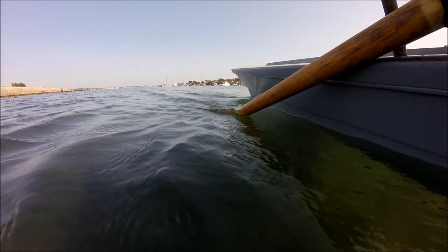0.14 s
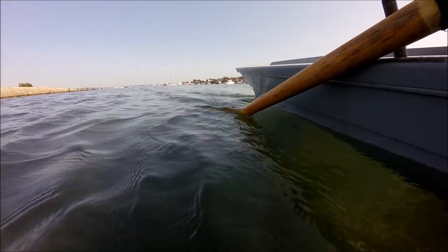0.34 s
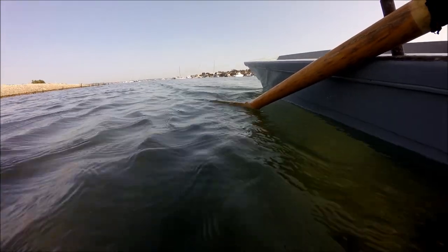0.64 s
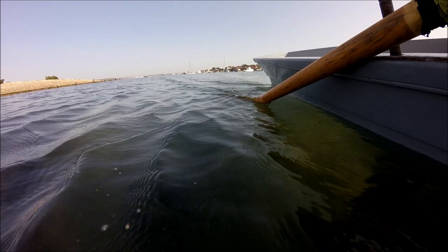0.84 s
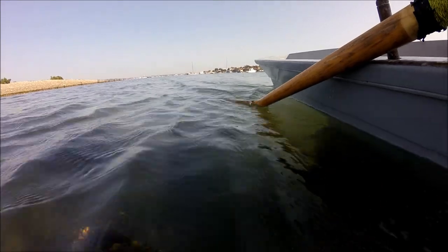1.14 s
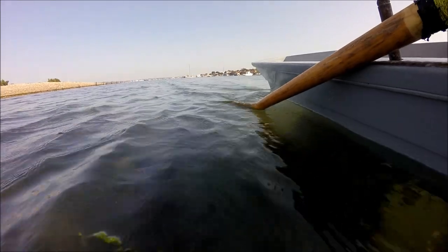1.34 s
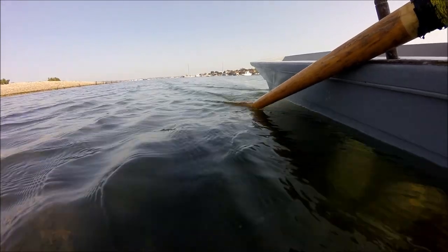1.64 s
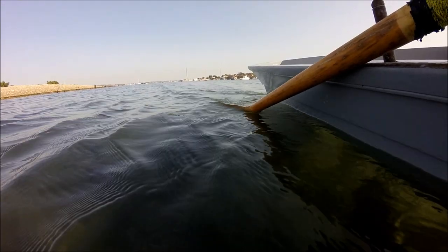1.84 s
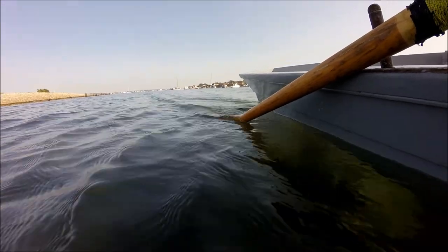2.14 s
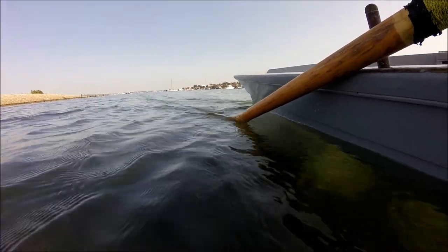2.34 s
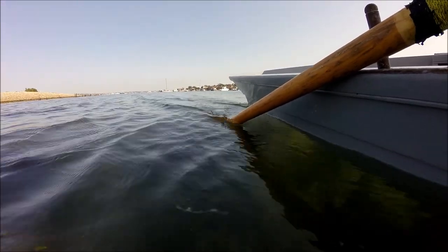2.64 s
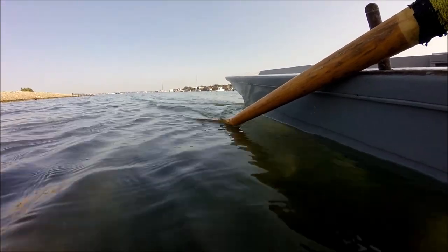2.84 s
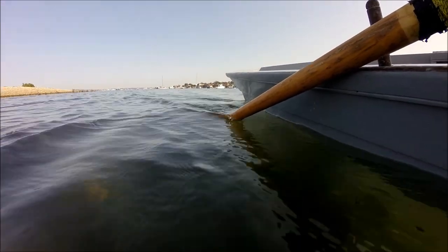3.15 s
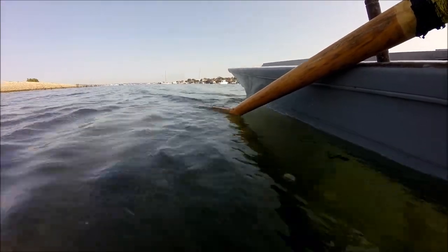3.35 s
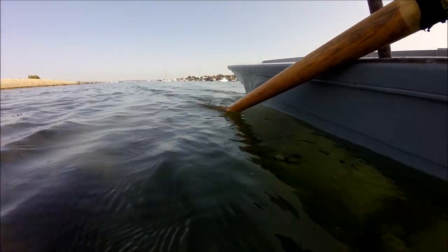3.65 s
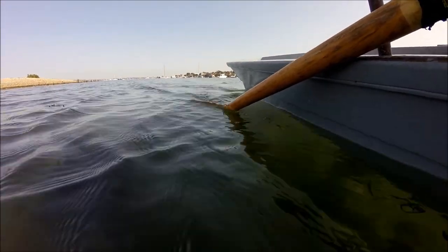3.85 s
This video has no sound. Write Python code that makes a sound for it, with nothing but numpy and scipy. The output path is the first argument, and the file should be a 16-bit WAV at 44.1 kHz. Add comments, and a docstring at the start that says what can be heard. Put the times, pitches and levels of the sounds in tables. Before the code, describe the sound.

Small waves lap and gurgle against a rowing boat's hull and oar, over light wind hiss

```python
"""Small waves lap at a rowing boat and its resting oar, on open water, microphone close by.
From the start, wind rumbles on the microphone over a steady hiss, and faint ripples plip and tick.
Laps come at once and keep coming: quick runs of bubbles, mostly from small to large, many with spray.
Trapped air gulps and single bubbles plip between them; from 0.3 s dull thuds come from the hull.
Every water sound gets a short ring from the hull's overhang."""
import sys
import numpy as np
from scipy import signal
from scipy.fft import rfft, irfft, next_fast_len
from scipy.io import wavfile

SR = 44100
rng = np.random.default_rng(int(sys.argv[2]) if len(sys.argv) > 2 else 0)


def file_out(sig):
    """Save sig as 16-bit WAV at sys.argv[1]."""
    # one column per channel
    cols = np.atleast_2d(sig).T
    # limit, then scale
    lim = np.clip(cols, -1, 1)
    pcm = np.round(lim * 32767).astype(np.int16)
    wavfile.write(sys.argv[1], SR, pcm)


N = 176400  # 4 s


def undb(db):
    """Decibels to gain."""
    return 10 ** (np.asarray(db) / 20)


def level(x, db):
    """Scale to an rms level in dB."""
    return x * undb(db) / np.sqrt(np.mean(x ** 2))


def colour(x, points):
    """Filter by a curve of (Hz, dB) points, joined by straight lines over log frequency."""
    hz, db = np.array(points).T
    size = next_fast_len(2 * len(x))
    f = np.maximum(np.fft.rfftfreq(size, 1 / SR), 1)
    gain = undb(np.interp(np.log(f), np.log(hz), db))
    return irfft(rfft(x, size) * gain, size)[:len(x)]


def add(out, start_s, x):
    """Mix a sound in at a time, cutting what runs past the end."""
    start = max(int(start_s * SR), 0)
    part = x[:max(len(out) - start, 0)]
    out[start:start + len(part)] += part


# Levels in the tables below are those at the source, before the trims, overhang and microphone.

# Strength of the wind rumble over time. Each row: time in seconds, level in dB.
RUMBLE_LEVEL = [(0, -39.5), (.28, -53), (.52, -32.5), (.74, -36.5), (1.0, -54), (1.15, -39.5), (1.8, -59),
                (1.99, -43), (2.18, -45), (2.27, -56.5), (2.49, -66), (2.58, -44), (2.74, -55.5),
                (2.80, -38.5), (3.0, -39.5), (3.12, -58), (3.24, -42.5), (3.58, -62), (4.0, -54.5)]
# Spectrum of the rumble. Each row: frequency in Hz, relative level in dB.
RUMBLE_SPECTRUM = [(20, -25), (45, -1), (75, -1), (130, -3), (320, -16.5), (700, -53.5)]
# Spectrum of steady air and distant water. Each row: frequency in Hz, relative level in dB.
HISS_SPECTRUM = [(30, -0.5), (400, -4.5), (1000, -9), (2000, -17.5), (3500, -18), (6000, -24), (10000, -18),
                 (15500, -18.5)]
RUMBLE_TRIM_DB, HISS_DB = -1.98, -53


def wind():
    """Low gusts on the microphone and a smooth, steady hiss, both of coloured noise."""
    gust_db = np.interp(np.arange(N) / SR, *np.array(RUMBLE_LEVEL).T)
    rumble = level(colour(rng.standard_normal(N), RUMBLE_SPECTRUM), RUMBLE_TRIM_DB) * undb(gust_db)
    hiss = level(colour(rng.standard_normal(N), HISS_SPECTRUM), HISS_DB)
    return rumble + hiss


GLIDE = 0.017  # share of its pitch a bubble gains per decay time


def bubble(hz, decay_s, rise_cycles, glide):
    """A pocket of air swells into ringing, then fades; its pitch creeps up by the glide."""
    rise_s = rise_cycles / hz
    t = np.arange(int((rise_s + 6 * decay_s) * SR)) / SR
    rise = np.sin(np.pi / 2 * np.minimum(t / rise_s, 1)) ** 2
    decay = np.exp(-np.maximum(t - rise_s, 0) / decay_s)
    phase = 2 * np.pi * hz * (t + glide * t ** 2 / (2 * decay_s))
    return rise * decay * np.sin(phase)


PLIP_RISE_S, PLIP_DECAY_S = 0.0015, 0.0075  # at 1 kHz
PLIP_SIZE_EXPONENT = 0.69  # how fast both shorten as the pitch goes up


def plip(hz):
    """One small bubble at the surface; the smaller, the sooner it swells and dies."""
    shorter = (hz / 1000) ** PLIP_SIZE_EXPONENT
    return bubble(hz, PLIP_DECAY_S / shorter, hz * PLIP_RISE_S / shorter, GLIDE)


RIPPLES_PER_S, RIPPLE_DB, RIPPLE_HZ, RIPPLE_SPREAD_OCT = 60, -57.5, 1100, 0.776
TICKS_PER_S, TICK_DB, TICK_HZ, TICK_SPREAD_OCT = 22, -55.5, 4580, 0.338
SCATTER_STRENGTH_DB = 4  # standard deviation of strength, for ripples and ticks


def scatter(per_s, db, centre_hz, spread_oct):
    """Single bubbles at random times, of random pitch and strength."""
    out = np.zeros(N)
    chance = rng.standard_normal(size=(900, 2))
    times = rng.random(size=len(chance)) * N / SR
    for s, (pitch, strength) in zip(times[:int(per_s * N / SR)], chance):
        hz = np.clip(centre_hz * 2 ** (spread_oct * pitch), 200, 9000)
        add(out, s, undb(db + SCATTER_STRENGTH_DB * strength) * plip(hz))
    return out


def ripples():
    """Faint bubbles and ticking tiny droplets all over the water nearby."""
    faint_bubbles = scatter(RIPPLES_PER_S, RIPPLE_DB, RIPPLE_HZ, RIPPLE_SPREAD_OCT)
    ticks = scatter(TICKS_PER_S, TICK_DB, TICK_HZ, TICK_SPREAD_OCT)
    return faint_bubbles + ticks


CLOUD_STRENGTH_DB = 3  # standard deviation of bubble strength, in laps and spray
CLOUD_SWELL_S, CLOUD_RISE_CYCLES = 0.0055, 0.41  # swell of the whole run, rise of each bubble


def cloud(length_s, first_hz, last_hz, per_s, spread_oct, cycles, fade_db):
    """A swelling run of bubbles, pitch sliding from first to last; rms 1 over its length."""
    chance = rng.standard_normal(size=(160, 2))
    jitter = rng.random(size=len(chance))
    count = int(np.clip(per_s * length_s, 2, len(chance)))
    out = np.zeros(int((length_s + .1) * SR))  # room for the last bubbles to ring
    for k, (pitch, strength) in enumerate(chance[:count]):
        along = (k + jitter[k]) / count  # 0 to 1 through the run
        centre_hz = first_hz * (last_hz / first_hz) ** along
        hz = np.clip(centre_hz * 2 ** (spread_oct * pitch), 150, 9000)
        gain = undb(CLOUD_STRENGTH_DB * strength + fade_db * along)
        swell = min(along * length_s / CLOUD_SWELL_S, 1)
        add(out, along * length_s, swell * gain * bubble(hz, cycles / hz, CLOUD_RISE_CYCLES, GLIDE))
    return out / np.sqrt(np.sum(out ** 2) / (length_s * SR))


# Bursts of spray as a lap breaks. Each row: start in seconds, level in dB, length in seconds.
SPRAY_BURSTS = [(0.009, -50.5, 0.04), (.533, -47.5, 0.025), (0.615, -50, 0.016), (.649, -50.5, 0.041),
                (.694, -45.5, .021), (1.072, -55.5, 0.029), (1.111, -49, .03), (1.49, -49.5, 0.031),
                (1.598, -58, 0.016), (1.98, -52.5, 0.022), (2.839, -47.5, 0.025), (3.274, -50, .043),
                (3.349, -55, 0.019), (3.765, -56.5, 0.043), (3.803, -51, 0.038)]
SPRAY_HZ, SPRAY_PER_S, SPRAY_SPREAD_OCT = 2427, 560, 0.446
FIZZ_HZ, FIZZ_PER_S, FIZZ_SPREAD_OCT = 5340, 530, 0.19
SPRAY_CYCLES = 3.9  # decay time of droplets and fizz, in cycles
SPRAY_FADE_DB = -1.5  # droplets, over the burst
SPRAY_TRIM_DB, FIZZ_DB = -4, -8.5  # fizz is against the droplets


def sprays():
    """The crest breaks into crackling droplets and a fizz of the tiniest bubbles."""
    out = np.zeros(N)
    for s, db, length_s in SPRAY_BURSTS:
        droplets = cloud(length_s, SPRAY_HZ, SPRAY_HZ, SPRAY_PER_S, SPRAY_SPREAD_OCT,
                         SPRAY_CYCLES, SPRAY_FADE_DB)
        fizz = cloud(length_s, FIZZ_HZ, FIZZ_HZ, FIZZ_PER_S, FIZZ_SPREAD_OCT, SPRAY_CYCLES, fade_db=0)
        add(out, s, undb(db + SPRAY_TRIM_DB) * (droplets + undb(FIZZ_DB) * fizz))
    return out


# Laps at the hull. Each row: start in seconds, rms level in dB, length in seconds,
# first bubble pitch in Hz, last bubble pitch in Hz (both before scatter).
LAP_RUNS = [(0.02, -42, 0.057, 1156, 561), (0.535, -35, 0.029, 1685, 465), (0.617, -46.5, 0.029, 1260, 420),
            (0.649, -40.5, .043, 1450, 466), (0.694, -39.5, .034, 1633, 318), (1.045, -47.5, 0.1, 653, 434),
            (1.123, -36.5, 0.031, 1410, 339), (1.262, -47.5, 0.014, 1070, 557), (1.5, -41, 0.038, 956, 494),
            (1.556, -50, 0.078, 386, 573), (1.957, -48.5, 0.031, 590, 426), (1.991, -44.5, .05, 1160, 293),
            (2.169, -48, 0.043, 943, 390), (2.280, -51.5, 0.013, 1550, 1200),
            (2.428, -47.5, 0.02, 733, 520), (2.599, -46, 0.037, 623, 496), (2.792, -40.5, 0.018, 1200, 606),
            (2.853, -39, 0.018, 1320, 700), (2.874, -46, 0.044, 633, 404), (3.274, -37.5, 0.026, 1510, 660),
            (3.303, -40.5, 0.033, 693, 440), (3.358, -39.5, 0.031, 660, 387), (3.759, -44, 0.049, 510, 385),
            (3.813, -44.5, 0.029, 1010, 690), (3.836, -49.5, 0.068, 370, 229)]
# Tone of the laps. Each row: frequency in Hz, gain in dB.
LAP_TONE = [(400, 2.5), (750, -0.5), (1050, 1.5), (1600, -4), (2600, 4), (8000, -1)]
LAP_BUBBLES_PER_S, LAP_SPREAD_OCT = 1000, 0.6045
LAP_CYCLES = 3.46  # decay time of each bubble, in cycles
LAP_TRIM_DB = -0.5


def laps():
    """A wave closes on the hull, catching bubbles that mostly grow larger along the run."""
    out = np.zeros(N)
    for s, db, length_s, first_hz, last_hz in LAP_RUNS:
        run = cloud(length_s, first_hz, last_hz, LAP_BUBBLES_PER_S, LAP_SPREAD_OCT, LAP_CYCLES, fade_db=-8)
        add(out, s, undb(db + LAP_TRIM_DB) * run)
    return colour(out, LAP_TONE)


# Gulps of trapped air. Each row: start in seconds, peak in dB, pitch in Hz, decay in seconds.
AIR_GULPS = [(.040, -33.5, 613, 0.0088), (0.044, -34, 288, 0.024), (0.55, -28, 425, 0.012),
             (0.566, -27, 327, 0.0052), (.627, -29.5, 317, 0.0091), (.664, -33, 438, 0.0082),
             (1.127, -26.5, 300.3, 0.016), (1.135, -27.5, 628, 0.012), (1.508, -37, 820, 0.018),
             (1.491, -36, 469, 0.023), (1.532, -28.5, 294, 0.0086), (1.972, -36, 321, 0.022),
             (2.175, -33, 455, 0.0077), (2.276, -36, 339, 0.013), (2.677, -38, 543, 0.0085),
             (3.287, -22, 367, 0.0074), (3.309, -31, 416, 0.01), (3.332, -24, 354, 0.006),
             (3.774, -37, 411, 0.036), (3.793, -28, 316, 0.012), (3.853, -37, 218, 0.013)]
GULP_TRIM_DB = -0.5


def gulps():
    """Large air pockets ring under the hull."""
    out = np.zeros(N)
    for s, db, hz, decay_s in AIR_GULPS:
        add(out, s, undb(db + GULP_TRIM_DB) * bubble(hz, decay_s, rise_cycles=0.94, glide=0.016))
    return out


# Single bubbles at the surface. Each row: start in seconds, peak in dB, pitch in Hz.
SINGLE_BUBBLES = [(.058, -36.5, 1754), (0.097, -41.5, 1880), (0.168, -36, 1057), (.165, -46, 5600),
                  (.448, -41.5, 1115), (.524, -40.5, 6000), (.578, -41.5, 2250), (0.643, -44, 2900),
                  (0.701, -29.5, 2630), (.707, -56, 5400), (.728, -43, 4040), (1.087, -30, 1160),
                  (1.264, -47, 1140), (1.293, -39, 4980), (1.502, -39, 2520), (1.547, -42, 1630),
                  (1.582, -46, 6340), (1.600, -30, 1203), (1.626, -37.5, 810), (1.686, -38, 1910),
                  (1.692, -43, 5370), (1.706, -41, 965), (1.985, -45, 5730), (2.17, -38, 1410),
                  (2.357, -40.5, 986), (2.498, -42, 1800), (2.509, -39.5, 5630), (2.849, -43, 2400),
                  (2.934, -44.5, 3110), (2.978, -43, 2670), (2.988, -39, 4400), (3.05, -39.5, 1147),
                  (3.306, -46, 5850), (3.398, -46, 2280), (3.742, -32.5, 1160), (3.809, -39, 2610)]
# Sharp snaps of bursting bubbles. Each row: start in seconds, nominal peak in dB.
BURST_SNAPS = [(.217, -38.5), (2.090, -35), (2.796, -29), (3.004, -40)]
PLIP_TRIM_DB = -4.5
SHED_DB, SHED_SPREAD_OCT = -6.5, 0.218  # shed bubbles, against the one that sheds them
SHED_CYCLES = 18  # longest wait, in cycles of the main bubble
SNAP_HZ, SNAP_DECAY_S = 5650, .0001


def plips():
    """Bubbles, each shedding two weaker ones near its pitch, and a few sharp snaps."""
    out = np.zeros(N)
    for s, db, hz in SINGLE_BUBBLES:
        gain = undb(db + PLIP_TRIM_DB)
        add(out, s, gain * plip(hz))
        for detune, wait in zip(rng.standard_normal(size=2), rng.random(size=2)):
            shed_hz = hz * 2 ** (SHED_SPREAD_OCT * detune)
            add(out, s + wait * SHED_CYCLES / hz, gain * undb(SHED_DB) * plip(shed_hz))
    for s, db in BURST_SNAPS:
        add(out, s, undb(db) * bubble(SNAP_HZ, SNAP_DECAY_S, rise_cycles=0.93, glide=0))
    return out


# Dull thuds of swell on the hull. Each row: start in seconds, nominal peak in dB, pitch in Hz.
HULL_THUDS = [(0.315, -33, 140), (.342, -32, 128), (0.442, -29.5, 123), (0.534, -25, 118),
              (0.707, -25.5, 180), (0.735, -25, 205), (1.051, -34.5, 138), (1.159, -28.5, 149),
              (1.195, -30, 207), (1.458, -37, 85), (1.911, -35, 74), (2.059, -38, 102), (2.531, -33.5, 109),
              (2.782, -22.5, 162), (2.807, -23.5, 112), (2.846, -28.5, 123), (2.986, -26, 103.5),
              (3.199, -36.5, 102), (3.962, -40.5, 90)]
THUD_RISE_CYCLES, THUD_DECAY_CYCLES = 0.71, 0.88
THUD_TRIM_DB = 1


def thuds():
    """Swell pushes on the hull: a couple of low cycles each time."""
    out = np.zeros(N)
    for s, db, hz in HULL_THUDS:
        thud = bubble(hz, THUD_DECAY_CYCLES / hz, THUD_RISE_CYCLES, glide=0)
        add(out, s, undb(db + THUD_TRIM_DB) * thud)
    return out


# Tone of the ring under the overhang. Each row: frequency in Hz, gain in dB.
OVERHANG_TONE = [(60, -12.5), (250, 2), (1200, -4), (3000, -9.5)]
OVERHANG_T60_S, OVERHANG_RISE_S, OVERHANG_DB = 0.16, 0.017, -7.5


def overhang(x):
    """Sound bounces briefly between the flared hull and the water: a short tail of noise."""
    t = np.arange(SR // 2) / SR
    decay = np.exp(-np.log(1000) * t / OVERHANG_T60_S)
    tail = rng.standard_normal(len(t)) * decay * np.minimum(t / OVERHANG_RISE_S, 1)
    tail = colour(tail / np.sqrt(np.sum(tail ** 2)), OVERHANG_TONE)
    return x + undb(OVERHANG_DB) * signal.fftconvolve(x, tail)[:N]


def scene():
    """Water at the hull, in light wind, as one channel."""
    water = ripples() + sprays() + laps() + gulps() + plips() + thuds()
    return (wind() + overhang(water))[None]


# The microphone's response, with its dip and peak. Each row: frequency in Hz, gain in dB.
MIC_RESPONSE = [(20, 4.5), (3600, -1.5), (4300, -6), (4850, -11), (5450, -0.5), (6300, -0.5), (16000, -9.5)]
LOW_CUT_HZ, TOP_HZ = 3.3, 15400


def record(dry):
    """The microphone has a dip in the treble; the lowest bass and the top are cut."""
    heard = np.array([colour(channel, MIC_RESPONSE) for channel in dry])
    low_cut = signal.butter(1, LOW_CUT_HZ, "high", fs=SR, output="sos")
    top_cut = signal.ellip(10, .1, 70, TOP_HZ, fs=SR, output="sos")
    return signal.sosfilt(top_cut, signal.sosfilt(low_cut, heard))


dry = scene()
out = record(dry)
file_out(out)
```